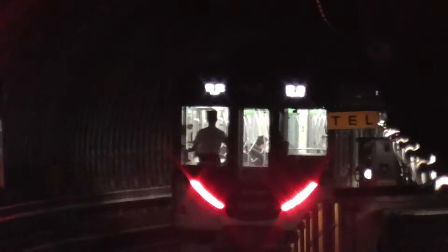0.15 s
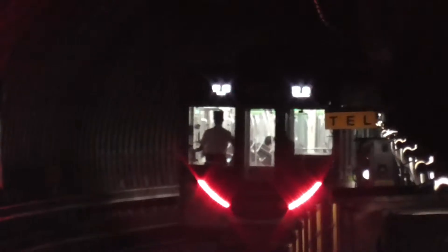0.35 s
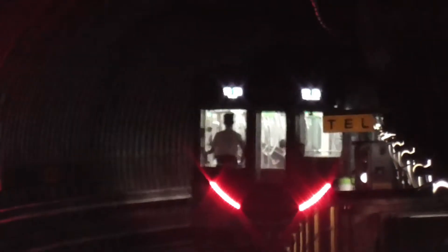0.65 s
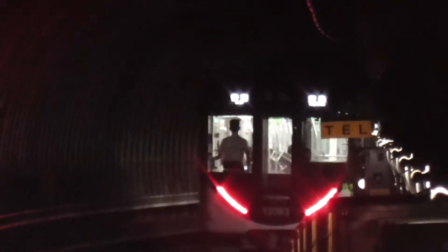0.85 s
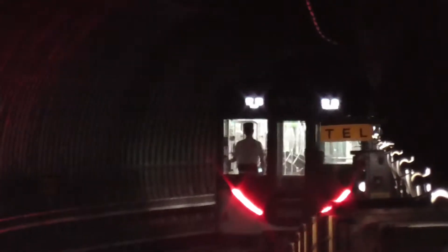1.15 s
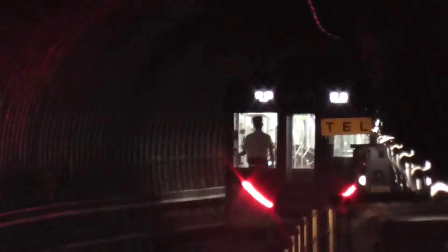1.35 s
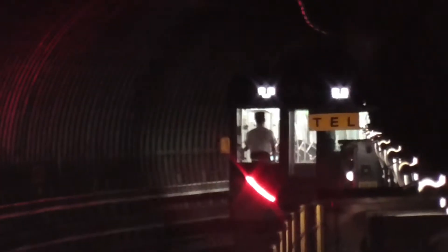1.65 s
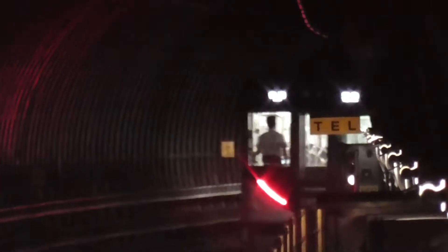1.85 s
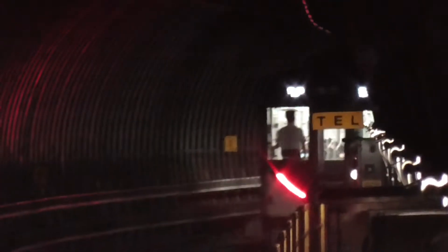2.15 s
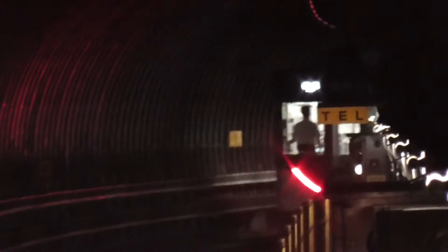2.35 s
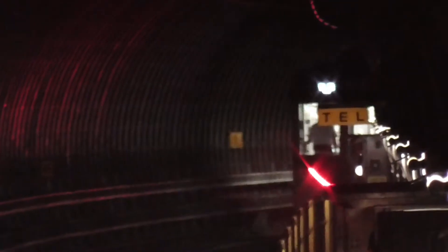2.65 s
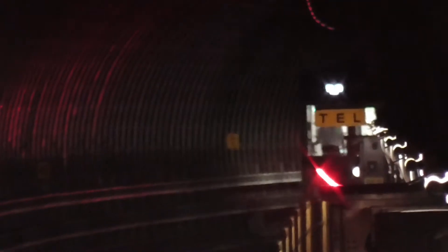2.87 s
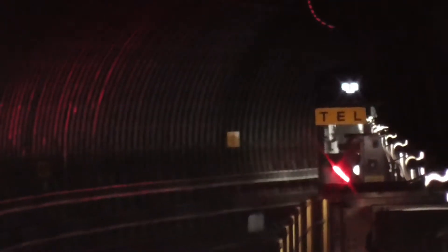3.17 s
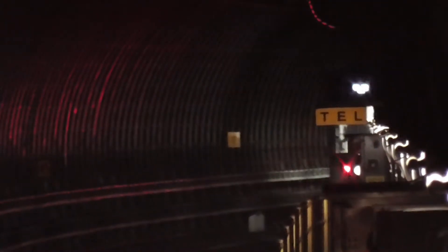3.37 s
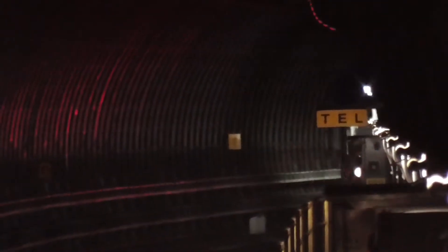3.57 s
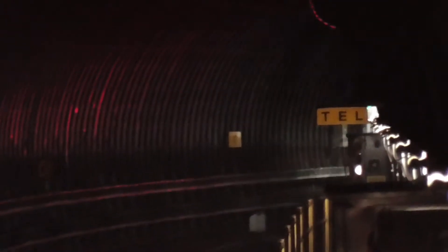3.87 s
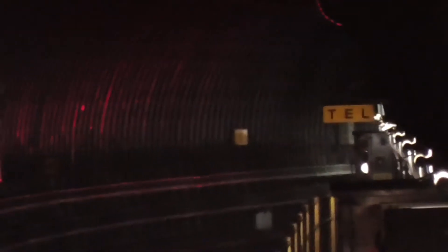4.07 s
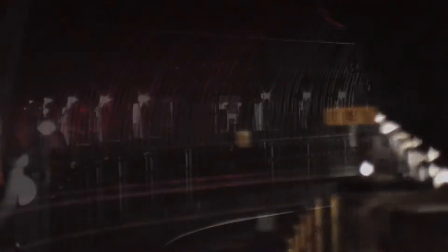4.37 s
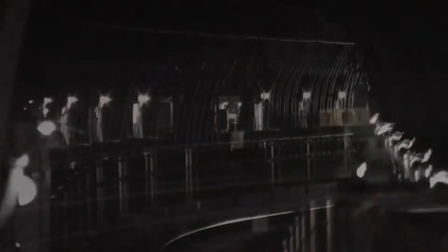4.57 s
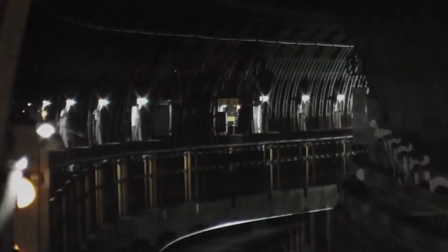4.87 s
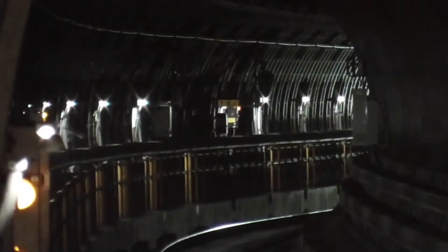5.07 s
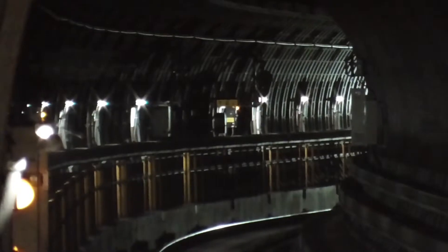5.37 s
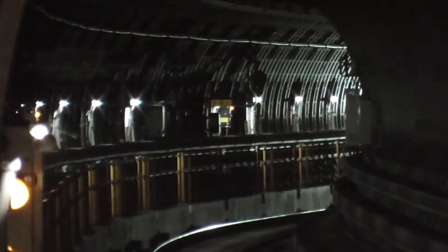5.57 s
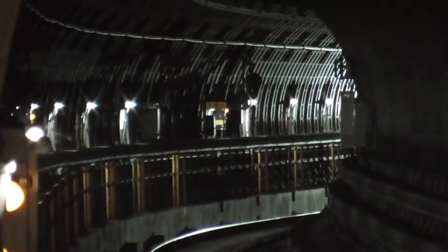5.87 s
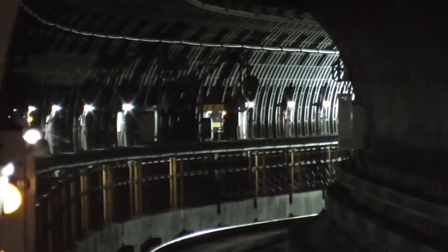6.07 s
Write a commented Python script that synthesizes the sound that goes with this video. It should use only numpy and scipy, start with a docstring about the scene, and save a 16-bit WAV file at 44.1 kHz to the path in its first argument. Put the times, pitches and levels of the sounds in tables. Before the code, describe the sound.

An electric train rumbles away into a tunnel, then fades out, giving way to the steady hum of a ventilation fan.

```python
"""An electric train pulls away into a tunnel: its wheels roar, make the tunnel boom and ring the rails.
Its motors drone, air hisses, the inverter (the motors' power supply) whines and the wheels squeal.
The train fades out and, after an instant of silence, an empty stretch of tunnel fades in:
a fan humming through its ducts, one thin squeak, and the rails starting to roar far away."""
import sys
import numpy as np
from scipy import signal
from scipy.fft import rfft, irfft, next_fast_len
from scipy.io import wavfile
from scipy.ndimage import uniform_filter1d, map_coordinates

SR = 44100
rng = np.random.default_rng(int(sys.argv[2]) if len(sys.argv) > 2 else 0)


def master(y):
    """Save y as 16-bit WAV."""
    cut = np.clip(np.atleast_2d(y).T, -1, 1)
    pcm = np.round(cut * 32767)  # scale
    wavfile.write(sys.argv[1], SR, pcm.astype(np.int16))


N = 274566
TIME = np.arange(N) / SR


def rolling():
    """Wheels shake the tunnel, the car bodies and the rails, ever farther away."""
    # tone of the wheels' roar: pitch_hz, relative_db
    roar_tone = [(20, -22), (48, -18), (90, -7), (200, 1.5), (296, -8), (400, -1), (560, -9), (850, -15.5),
                 (1050, -16.5), (1350, -23), (1650, -34), (2100, -36), (3000, -51.5), (6000, -83)]
    # notes at which the tunnel, car bodies and rails ring: pitch_hz, width_hz, relative_db
    tunnel_notes = [(82.3, 10.3, -5), (92, 5.1, -8.5), (144, 14.5, -5.5), (181, 12.5, -1.5),
                    (203.3, 18, -3), (229.7, 7, 5.5), (313.6, 4.4, -6), (333.5, 19, -6), (428, 21.3, -4.5),
                    (530, 48, -13.5), (607, 18, -22), (770, 85, -18)]
    body_notes = [(247.8, 4, -2.5), (254, 21, -9), (270, 14, -6)]
    rail_notes = [(1143, 50, -4), (1225, 89, 5), (1294, 87, -4)]
    # how loudly the rails ring: time_s, level_db
    rail_levels = [(0, -52.5), (.6, -48.5), (1.1, -43), (1.8, -47.5), (2.6, -53), (3.2, -54.5), (3.65, -48),
                   (4, -60), (4.5, -65)]
    rail_db, = curves(rail_levels)
    wheel_gain = receding(start_db=-31, loss_db_per_s=1.5) * pickup()
    roar = amp(3.0 + 0.41 * wobble(rate_hz=12)) * rush(roar_tone)
    tunnel = amp(4.5) * ringing(tunnel_notes)
    bodies = amp(-1) * steadied(ringing(body_notes), share=0.1)
    return wheel_gain * (roar + tunnel + bodies) + amp(rail_db) * ringing(rail_notes)


def tunnel_boom():
    """The train stirs the tunnel's air at its lowest notes; each one throbs at its own pace."""
    # the main, upper and deepest booms: pitch_hz, width_hz, relative_db
    main_note = [(111.45, 7.1, 0)]
    upper_note = [(131, 16, 0)]
    deep_note = [(55.5, 4.4, 0)]
    # how the main and deepest booms rise and fall: time_s, relative_db
    main_levels = [(.05, -24), (.48, -26), (.62, -38), (1.07, -34), (1.16, -24.5), (1.5, -26.5), (1.8, -33),
                   (1.97, -26.5), (2.5, -33), (2.75, -33), (2.88, -25), (3.53, -27.5), (3.73, -45),
                   (3.98, -25), (4.4, -27), (4.6, -28.5)]
    deep_levels = [(0, -52), (1.1, -59), (1.6, -42), (2.6, -50.5), (4.4, -49)]
    main_db, = curves(main_levels)
    deep_db, = curves(deep_levels)
    main = amp(main_db - 1.5) * steadied(ringing(main_note), share=0.86)
    upper = amp(-32.5) * ringing(upper_note)
    deep = amp(deep_db) * steadied(ringing(deep_note), share=0.35)
    return main + upper + deep


def motors(pitch_hz=254, width_hz=10.6, climb_hz_per_s=31.1):
    """A rough tone swells and dies away as the motors speed up through a note that rings easily."""
    # swells of the motors' drone: start_s, length_s, level_db
    surges = [(-.15, 0.66, -30), (0.334, 0.71, -28.5), (1.344, 0.66, -32), (3.628, .98, -29.5)]
    drone = steadied(ringing([(pitch_hz, width_hz, 0)]), share=0.49)
    shiftable = signal.hilbert(drone, next_fast_len(N))[:, :N]  # multiplying this slides its pitch
    sound = 0
    for start, length, db in surges:
        climb = np.exp(1j * np.pi * climb_hz_per_s * (TIME - start - length / 2) ** 2)
        sound += amp(db) * swell(start, length) * (shiftable * climb).real
    return sound


def air_hiss(settle_s=0.6):
    """Air hisses, loudest at the start, and spits in short bursts a little to the right."""
    # tone of the hiss and of the spits: pitch_hz, relative_db
    hiss_tone = [(1000, -18), (2200, 1), (3200, 0), (4600, -0.5), (5700, -9), (6500, -9.5), (7700, -6),
                 (9400, -9.5), (12000, -22), (15500, -23)]
    spit_tone = [(2000, -15), (3200, 3), (6000, -7), (7900, 1), (9500, -14), (15000, -12)]
    # spits of air: start_s, length_s, relative_db
    bursts = [(0, 0.19, -68), (0.678, .045, -58), (1.397, .14, -67), (3.378, .12, -68), (3.65, 0.49, -65)]
    hiss = amp(-62 + 5 * np.exp(-TIME / settle_s)) * pickup() * rush(hiss_tone)
    spits = sum(amp(db) * swell(start, length) for start, length, db in bursts) * rush(spit_tone)
    return hiss + lean_right(spits)


def inverter():
    """The motors' power supply fizzes and whines as it rapidly switches the current."""
    # tone of the fizz: pitch_hz, relative_db
    fizz_tone = [(3000, -36), (7000, -9), (10000, -6.5), (10900, 4.5), (12200, 5.5), (14500, 2),
                 (15700, -6)]
    whine = amp(-3.0) * ringing([(10420, 110, -1.0), (12053, 25, -15)])
    fizz = amp(3.2) * rush(fizz_tone)
    return lean_right(receding(start_db=-66, loss_db_per_s=2) * (fizz + whine))


def wheel_squeals():
    """Wheel rims slip against the rail on a curve and sing brief, slightly wavering tones."""
    # squeals and scrapes: start_s, length_s, pitch_hz, width_hz, level_db
    squeals = [(0, 0.11, 2000, 20, -59), (.09, 0.08, 2360, 8.2, -60), (0.164, 0.11, 2348, 10, -55),
               (0.28, 0.11, 2348, 8.9, -58), (0, 0.21, 4400, 250, -64), (2.1, .65, 1670, 20, -62),
               (2.18, 0.34, 1880, 20, -65)]
    return sum(amp(db) * swell(start, length) * steadied(ringing([(hz, width, 0)]), share=1.0)
               for start, length, hz, width, db in squeals)


def ventilation():
    """A fan's wavering hum sounds through its ducts, over a steady rush."""
    # notes of the fan, ducts and airway: pitch_hz, width_hz, relative_db
    fan_note = [(142.1, 5.3, 0)]
    duct_notes = [(446, 39, 0), (440, 26, -16.5), (483, 21, -5.5), (515, 40, -5.5)]
    airway_notes = [(86, 15, -8), (123.4, 3.1, 1), (249.5, 17, -11), (335, 60, -12.5)]
    # how the hum wavers: time_s, relative_db
    waver = [(4.72, -8), (4.82, -1.5), (5.08, 5.5), (5.26, -10), (5.4, 1.5), (5.66, -7.5), (5.78, -0.5),
             (6.2, 6)]
    # tone of the steady rush: pitch_hz, relative_db
    rush_tone = [(20, -17), (60, -14), (100, 5.5), (200, -2), (500, -13.5), (700, -10), (1000, -16),
                 (1350, -24.5), (1700, -30), (2700, -39), (4400, -42), (5800, -50.5), (8000, -46),
                 (15500, -52)]
    waver_db, = curves(waver)
    hum = amp(-33.5 + waver_db) * steadied(ringing(fan_note), share=1.0)
    ducts = amp(-36.5) * ringing(duct_notes) + amp(-38) * ringing(airway_notes)
    return hum + ducts + amp(-37.5) * rush(rush_tone)


def far_rails(start_s=5.76, rise_s=0.21, quiet_db=-50, rise_db=14.5):
    """Distant wheels lift the rails from a faint ring to a roar."""
    # notes of the distant rails: pitch_hz, width_hz, relative_db
    rail_notes = [(570, 220, -0.5), (770, 35, -1.5), (900, 83, -7), (1100, 35, -10.5), (1280, 87, -7.5)]
    rise = np.clip((TIME - start_s) / rise_s, 0, 1)
    return amp(quiet_db + rise_db * rise) * ringing(rail_notes)


def squeak(jitter_hz=190, echo_s=0.7, ring_start_s=5.1, ring_s=1.6):
    """Steel slips on steel: a thin, rough, rising squeak that echoes down the tunnel."""
    # path of the squeak: time_s, pitch_hz, relative_db
    path = [(5.09, 9400, -85), (5.135, 9700, -68), (5.16, 10600, -70), (5.195, 11150, -67),
            (5.22, 11400, -80), (5.265, 12300, -87), (5.3, 12400, -100)]
    # notes that ring on after it: pitch_hz, width_hz, relative_db
    ring_notes = [(8000, 250, -2), (9750, 200, 2)]
    hz, db = curves(path)
    sounding = (TIME > path[0][0]) & (TIME < path[-1][0])
    jitter = jitter_hz * unit(uniform_filter1d(rng.standard_normal(N), size=40))
    glide = sounding * amp(db - 2.0) * np.sin(2 * np.pi * np.cumsum(hz + jitter) / SR)
    tail = rng.standard_normal((2, SR)) * amp(-60 * TIME[:SR] / echo_s)
    echo = signal.fftconvolve(glide[None], tail / np.linalg.norm(tail[0]), axes=1)[:, :N]
    age = np.maximum(TIME - ring_start_s, 0)
    ring_gain = amp(-67.5 - 60 * age / ring_s) * (1 - np.exp(-age / 0.026))
    return glide + amp(8.0) * echo + ring_gain * ringing(ring_notes)


def receding(start_db, loss_db_per_s):
    """Gain of a source that moves steadily away."""
    return amp(start_db - loss_db_per_s * TIME)


def pickup(start_s=3.64, db_per_s=2):
    """Gain that the train wins back as it gathers speed."""
    return amp(db_per_s * np.maximum(TIME - start_s, 0))


def rush(tone):
    """Broad noise shaped by (pitch_hz, relative_db) points."""
    return tunnel_noise(lambda hz: amp(along(tone, hz)))


def ringing(notes):
    """Notes kept ringing by random shaking; the wider a note, the noisier it sounds."""
    return tunnel_noise(lambda hz: sum(amp(db) / (1 + 2 * ((hz - pitch) / width) ** 2)
                                       for pitch, width, db in notes))


def steadied(x, share):
    """Even out a ringing note: share 0 throbs freely, share 1 is nearly level."""
    strength = np.abs(signal.hilbert(x.mean(axis=0), next_fast_len(N)))[:N]
    return unit(x / (strength + 0.16) ** share)


def tunnel_noise(response):
    """Echoing stereo noise: the bass alike in both ears, the treble mostly different."""
    # how alike the two ears are: pitch_hz, likeness (0 to 1)
    likeness = [(30, .3), (60, 0.9), (150, 0.99), (300, 0.94), (600, 0.83), (1200, 0.68), (4000, 0.48),
                (8000, 0.26), (14000, .12)]
    size = next_fast_len(N + 8192)
    hz = np.fft.rfftfreq(size, 1 / SR)
    spread = np.arccos(along(likeness, hz)) / 2
    spectrum = rfft(rng.standard_normal((2, size))) * response(hz)
    mid, side = irfft(spectrum * [np.cos(spread), np.sin(spread)], size)[:, :N]
    return unit(np.array([mid + side, mid - side]))


def lean_right(x):
    """Make the right ear 3 dB louder than the left."""
    return x * amp([[-1.5], [1.5]])


def amp(db):
    """Turn decibels into a gain to multiply by."""
    return 10 ** (np.asarray(db) / 20)


def unit(x):
    """Scale to an average (rms) level of 1."""
    return x / np.sqrt(np.mean(x ** 2) + 1e-20)


def along(points, hz):
    """Read between (pitch_hz, value) points, with octaves evenly spaced."""
    pitches, values = np.transpose(points)
    return np.interp(np.log(hz + 1), np.log(pitches + 1), values)


def curves(rows):
    """One value per sample for each column after the time."""
    times, *columns = np.transpose(rows)
    return [np.interp(TIME, times, column) for column in columns]


def wobble(rate_hz):
    """A smooth curve through rate_hz random values a second."""
    return map_coordinates(rng.standard_normal(256), [TIME * rate_hz], mode="mirror")


def swell(start, length):
    """A smooth rise and fall."""
    return np.sin(np.pi * np.clip((TIME - start) / length, 0, 1))


def scene(fade_s=4.346, silent_s=4.657, resume_s=4.676, full_s=5.12):
    """The train fades out, the empty tunnel fades in."""
    leaving = np.interp(TIME, [fade_s, silent_s], [1, amp(-7.5)]) * (TIME < silent_s)
    arriving = np.interp(TIME, [resume_s, full_s], [amp(-4), 1]) * (TIME > resume_s)
    leaving, arriving = uniform_filter1d([leaving, arriving], size=160)  # soft edges do not click
    train = rolling() + motors() + tunnel_boom() + air_hiss() + inverter() + wheel_squeals()
    empty_tunnel = ventilation() + far_rails() + squeak()
    return leaving * train + arriving * empty_tunnel


def record(dry, top_hz=15650):
    """Cut away the very highest treble."""
    size = next_fast_len(N + SR // 2)
    kept = np.fft.rfftfreq(size, 1 / SR) < top_hz
    return irfft(rfft(dry, size) * kept, size)[:, :N]


dry = scene()
out = record(dry)
master(out)
```